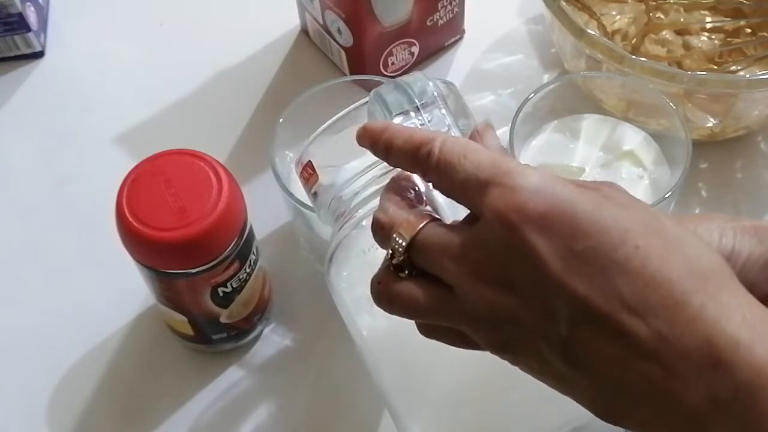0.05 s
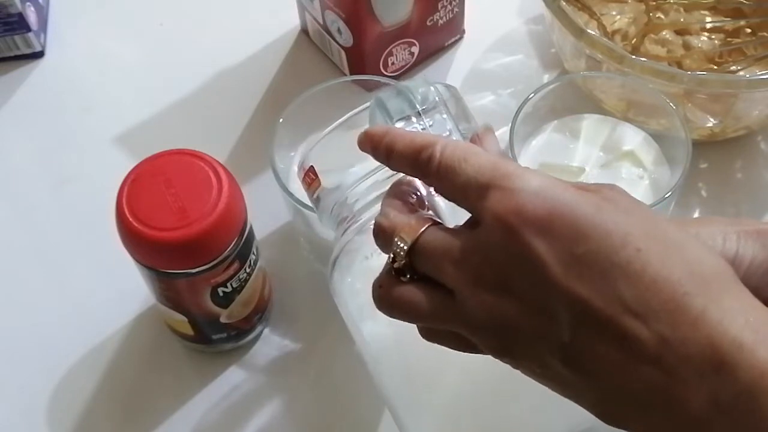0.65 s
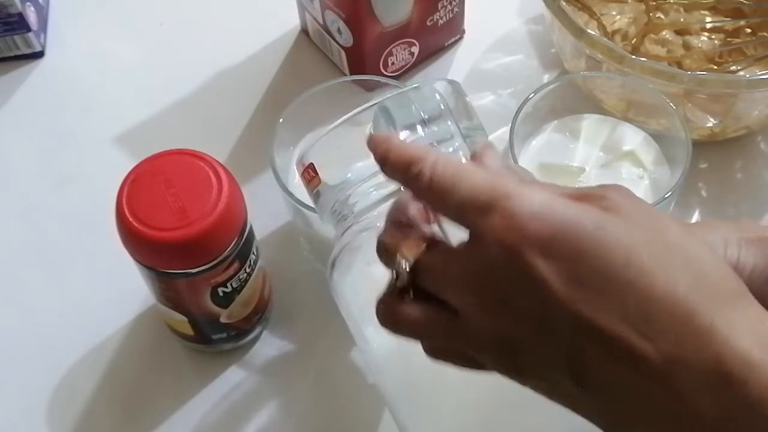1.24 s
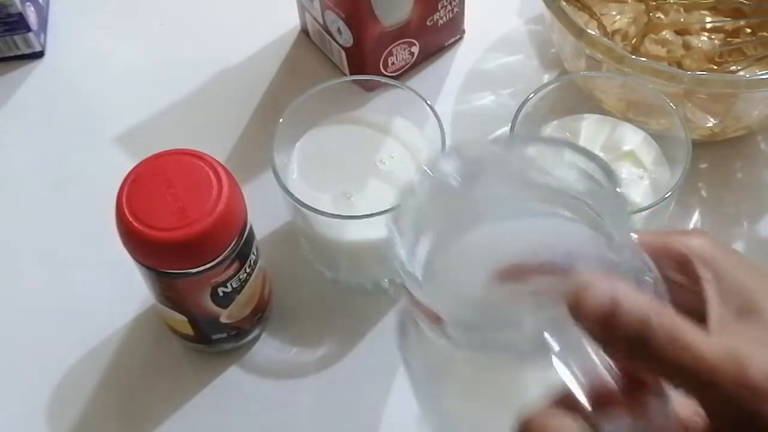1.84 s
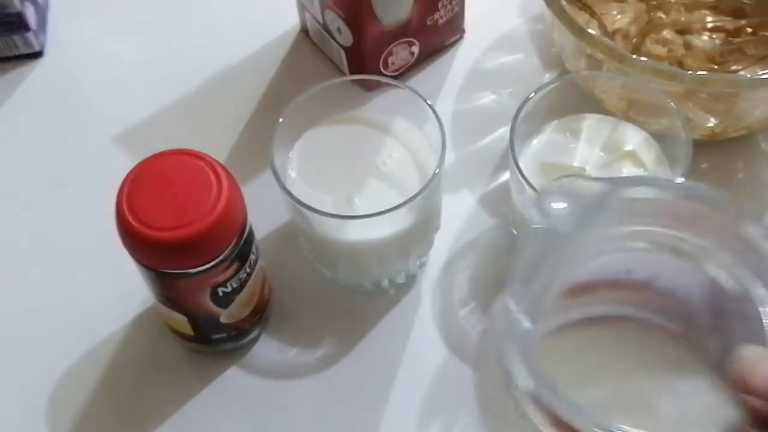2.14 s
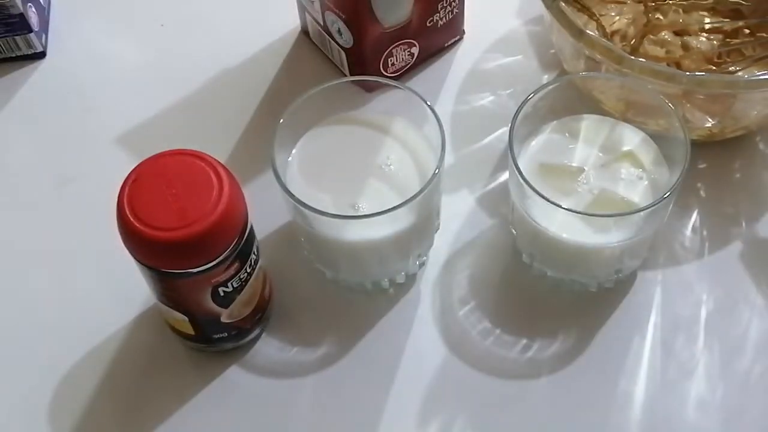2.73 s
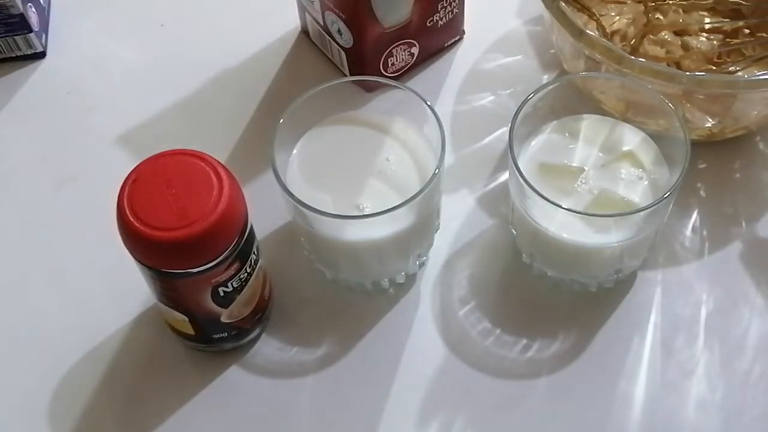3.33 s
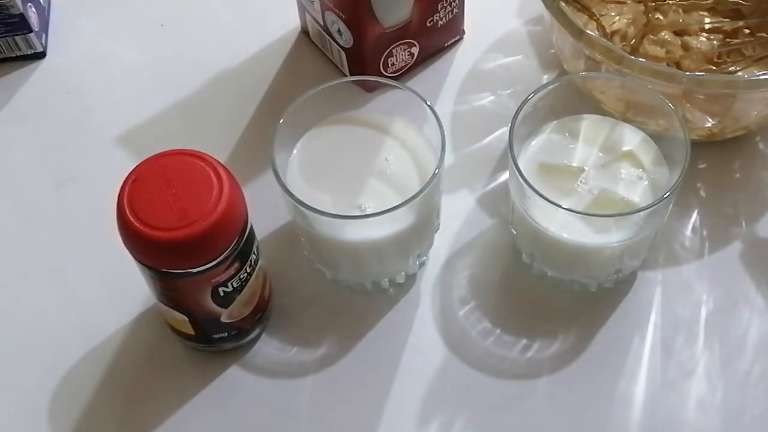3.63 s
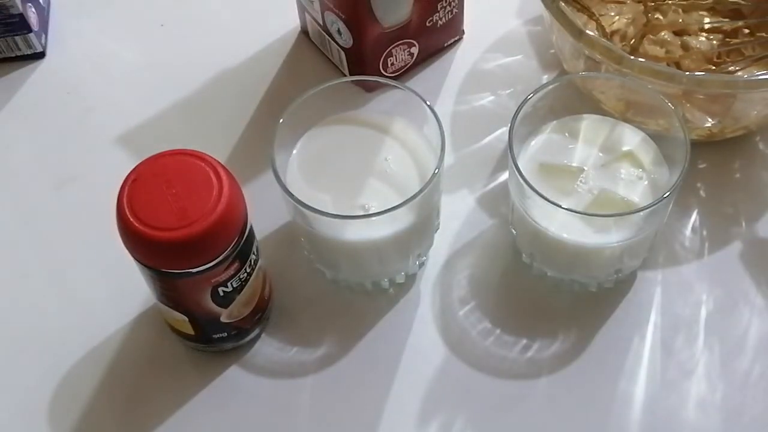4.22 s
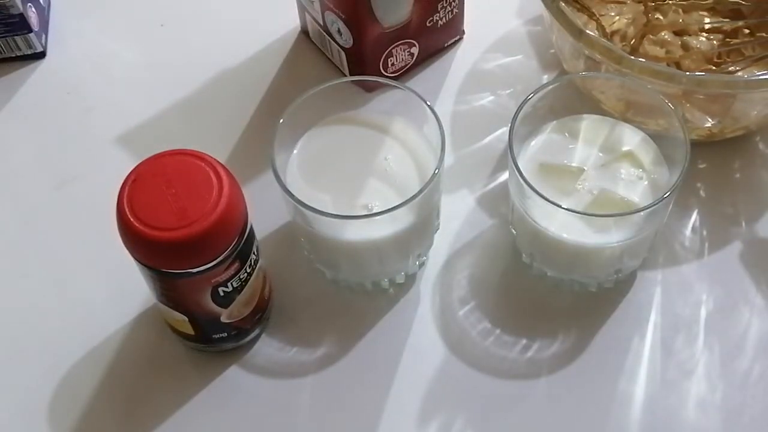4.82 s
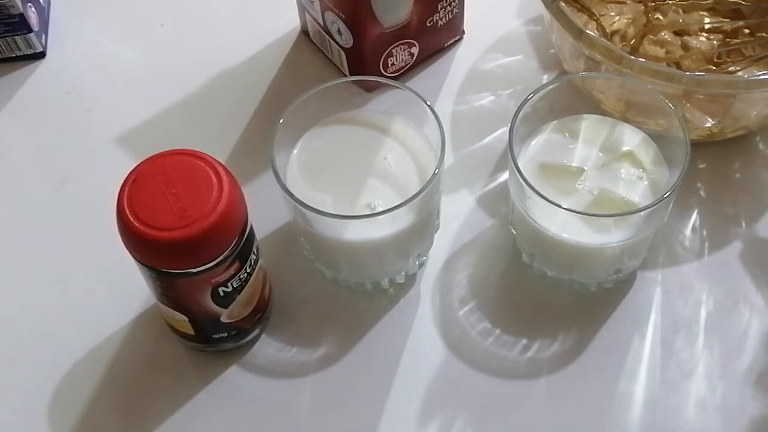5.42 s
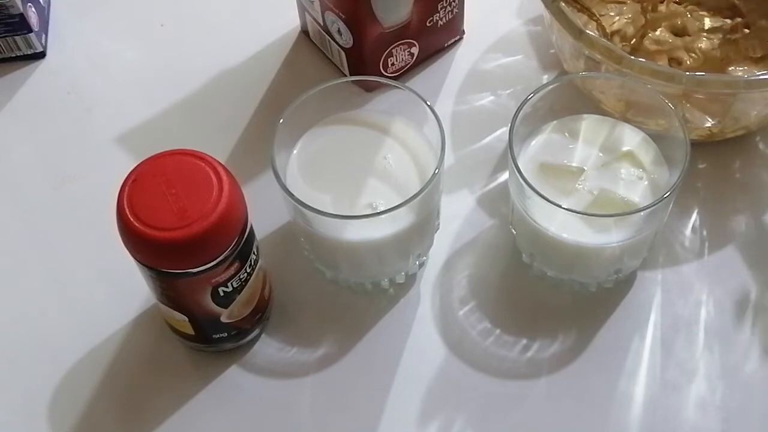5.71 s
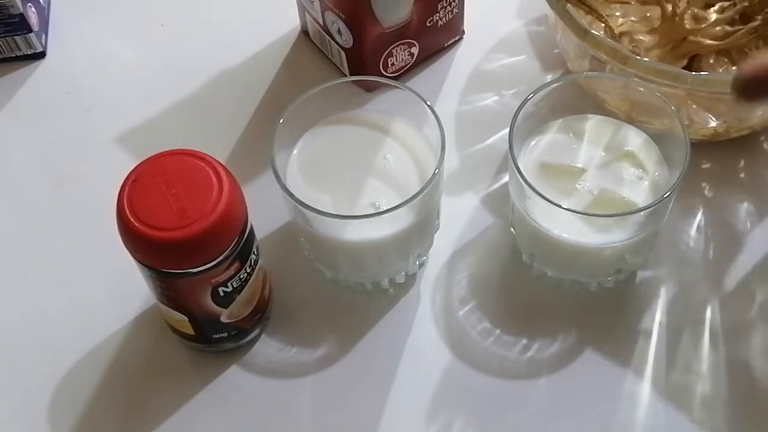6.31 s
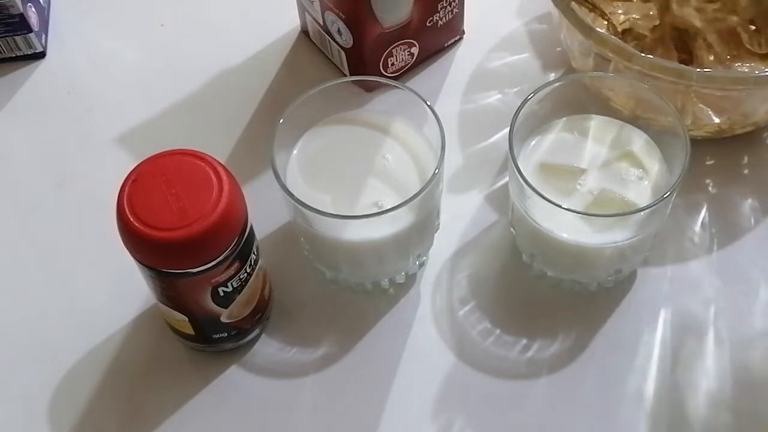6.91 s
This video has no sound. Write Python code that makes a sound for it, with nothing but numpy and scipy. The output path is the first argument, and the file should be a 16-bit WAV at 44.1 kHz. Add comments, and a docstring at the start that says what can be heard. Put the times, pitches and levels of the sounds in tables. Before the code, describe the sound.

The sounds are close, in a quiet kitchen whose hard surfaces add a short reverberation. A very faint motor hum and a high pulsing insect continue throughout. Around 0.5 seconds the last milk gulps faintly out of a bottle, and at 1 second the neck clinks lightly on a tumbler. Faint hand and sleeve rustling follows, with a dull low bump at 2.9 seconds and small glass ticks near 3.3. At about 4.1 seconds the glass bottle lands on the table with a loud, hollow knock. A quick cluster of knocks, equally strong at first, follows from 4.3 seconds as it rocks and rattles to rest by 4.7. From about 4.9 seconds a hand brushes softly about. Something steel, perhaps a spoon, gives short bright clinks between 5.6 and 6.2 seconds. A soft bump and a last brush come around 6.5 seconds.

```python
"""A glass bottle is set down on a kitchen table and rocks to rest, each impact exciting the modes of
the table top, the glass wall and the enclosed air. Before that, the last milk gulps out and the neck
ticks on a tumbler; afterwards a hand brushes about and picks up something of steel, perhaps a spoon.
A motor hums, an insect pulses faintly outside, and the hard room reverberates after each contact."""
import sys
import numpy as np
from scipy import signal
from scipy.fft import rfft, irfft, next_fast_len
from scipy.io import wavfile
from scipy.ndimage import map_coordinates

SR = 44100
rng = np.random.default_rng(int(sys.argv[2]) if len(sys.argv) > 2 else 0)


def transcribe(u):
    """Save the signal u as a 16-bit wav file named by the first command-line argument.

    u: samples, shape (n,) or (channels, n), limited to [-1, 1]; the rate is SR.
    q: integer samples, one column per channel.
    """
    v = np.clip(np.atleast_2d(u).T, -1, 1)
    q = np.round(v * 32767).astype(np.int16)
    wavfile.write(sys.argv[1], SR, q)


N = 311787
TIME = np.arange(N) / SR
AGE = np.arange(SR) / SR  # time since a contact [s]
CAVITY_HZ, BOTTLE_PAN_DB = 559.4, 2.5  # resonance of the air in the bottle; left over right

# spectrum of the table's densely spaced modes: (frequency [Hz], level [dB])
THUD_SPECTRUM = [(40, -46), (70, -12), (125, -1.5), (200, -9.5), (300, -0.5), (450, -6), (650, -7.5),
                 (1300, -4), (1900, -15.5), (3100, -23), (4000, -33.5), (7500, -27), (10000, -38),
                 (15000, -49)]
# spectrum of a hard contact: (frequency [Hz], level [dB])
TICK_SPECTRUM = [(300, 2), (1500, 6.5), (3500, 6), (7000, 11.5), (10000, -2), (15000, -20)]
# likeness of left and right: (frequency [Hz], correlation [0..1])
COHERENCE = [(30, 0.24), (80, 0.55), (150, 0.48), (500, 0.38), (1200, 0.026), (4000, 0.02)]


def amp(db):
    """Amplitude grows tenfold every 20 dB."""
    return 10 ** (np.asarray(db) / 20)


def along(points, hz):
    """Interpolation of (frequency, value) points on a logarithmic frequency axis."""
    freqs, values = np.transpose(points)
    return np.interp(np.log(hz + 1), np.log(freqs + 1), values)


def filtered(x, response):
    """A linear filter multiplies the spectrum by its frequency response."""
    size = x.shape[-1]
    padded = next_fast_len(size + SR // 4)
    return irfft(rfft(x, padded) * response(np.fft.rfftfreq(padded, 1 / SR)), padded)[..., :size]


def low_pass(ratio):
    """Second-order Butterworth response at a ratio of frequency to corner frequency."""
    return 1 / (1 + np.sqrt(2) * 1j * ratio - ratio ** 2)


def softened(x, corner_hz):
    """A longer contact acts as a low-pass filter."""
    return filtered(x, lambda hz: low_pass(hz / corner_hz))


def thinned(x, corner_hz):
    """A lighter contact acts as a high-pass filter."""
    return filtered(x, lambda hz: -(hz / corner_hz) ** 2 * low_pass(hz / corner_hz))


def panned(pan_db):
    """A level difference, left over right, gives direction."""
    return amp([[pan_db / 2], [-pan_db / 2]])


def half_angle(hz):
    """Correlation is the cosine of the angle between two channels; each takes half of it."""
    return np.arccos(np.clip(along(COHERENCE, hz), -1, 1)) / 2


def noise(spectrum, size):
    """Independent mid and side noises sum to coloured stereo of rms 1, more coherent in the bass."""
    def response(hz):
        return amp(along(spectrum, hz)) * [np.cos(half_angle(hz)), np.sin(half_angle(hz))]
    mid, side = filtered(rng.standard_normal((2, size)), response)
    stereo = np.array([mid + side, mid - side])
    return stereo / np.sqrt(np.mean(stereo ** 2) + 1e-20)


def wobble(per_s, size=N):
    """Smooth random modulation: a spline through per_s Gaussian values a second."""
    return map_coordinates(rng.standard_normal(int(size * per_s / SR) + 4), [TIME[:size] * per_s])


def swell(middle_s, width_s):
    """Gaussian envelope whose width is one standard deviation."""
    return np.exp(-.5 * ((TIME - middle_s) / width_s) ** 2)


def fade(t60, attack):
    """A damped vibration builds quickly and decays exponentially, 60 dB in t60 seconds."""
    return amp(-60 * AGE / t60) * (1 - np.exp(-AGE / attack))


def mode(hz, db, t60, attack):
    """A normal mode is a damped sinusoid; low coherence sets its left and right phases apart."""
    phase_offset = half_angle(hz) * rng.choice([-1, 1]) * np.array([[1], [-1]])
    envelope = amp(db + rng.normal(0, 1)) * fade(t60, attack)
    return envelope * np.sin(2 * np.pi * (hz * AGE + rng.random()) + phase_offset)


def in_kitchen(x, wet_db, early_db):
    """Early reflections from near surfaces and a diffuse reverberant tail join the direct sound."""
    # the room's reverberation time: (frequency [Hz], t60 [s])
    reverb_times = [(100, 0.081), (250, 1), (550, 0.66), (1200, 0.49), (3000, 0.49), (6000, 0.4),
                    (12000, 0.32)]
    hz, t, bands = signal.stft(noise([(100, 0), (10000, 0)], SR), SR, nperseg=256)
    decay = amp(-60 * t / along(reverb_times, hz)[:, None])
    tail = signal.istft(bands * decay, SR, nperseg=256)[1][:, :SR]
    tail *= np.clip(AGE / 0.00096, 0, 1) ** 2
    early = rng.standard_normal((2, SR)) * (rng.random((2, SR)) < .02) * fade(0.041, 0.0047)
    response = amp(wet_db) * tail / np.linalg.norm(tail[0])
    response += amp(early_db) * early / np.linalg.norm(early[0])
    return x + signal.fftconvolve(x, response, axes=1)[:, :SR]


def add(track, s, x):
    """Superposition: x joins the track at time s."""
    part = track[:, round(s * SR):][:, :SR]
    part += x[:, :part.shape[1]]


def room_air():
    """Ambient sound is steady broadband noise, strongest in the bass."""
    # spectrum of the air: (frequency [Hz], level [dB])
    air_spectrum = [(15, -40), (25, 2.5), (104, -5), (133, -9), (233, -7), (400, -9.5), (700, -11.5),
                    (1020, -19), (1570, -20), (3000, -21.5), (3900, -28.5), (5000, -23), (7700, -28.5),
                    (15500, -33.5)]
    return amp(-63) * noise(air_spectrum, N)


def motor():
    """A motor radiates a line spectrum, slightly modulated in amplitude and phase."""
    # hum lines: (frequency [Hz], level [dB], flutter rate [1/s])
    lines = [(103.5, -76.5, 4.2), (235, -78, 6.2), (744.4, -73, 2.845), (978, -89, 1.6), (1042, -88.5, 5.2)]
    hum = np.zeros(N)
    for hz, db, flutter in lines:
        envelope = np.sqrt(2) * amp(db) * (1 + .18 * wobble(flutter))
        hum += envelope * np.sin(2 * np.pi * hz * TIME + 0.26 * wobble(flutter))
    return hum * panned(9.9)


def insect():
    """A far chirp is heard as amplitude-modulated narrow-band noise over a steady hiss."""
    # the chirp's band: (frequency [Hz], level [dB])
    chirp_band = [(4500, -62), (5400, -20), (5720, -11), (5830, 4.5), (5930, 7.5), (6060, -0.5),
                  (6250, -23), (6600, -29.5), (8000, -66)]
    # the wider hiss around it: (frequency [Hz], level [dB])
    chorus_band = [(4300, -23), (5400, -4), (5900, 2), (6300, -6), (7200, -11), (8500, -23.5)]
    beats_per_s, first_beat_s, depth_db = 5.54, 0.12, 4.5
    beats = beats_per_s * (TIME - first_beat_s) + 0.14 * wobble(1.95)
    chirp_db = -71 + depth_db * np.cos(2 * np.pi * beats) + 0.89 * wobble(6.2)
    return amp(chirp_db) * noise(chirp_band, N) + amp(-72) * noise(chorus_band, N)


def sleeve():
    """Cloth friction makes a dull, broad noise whose level follows the moving arm."""
    # course of the rustle: (time [s], level [dB])
    motion = [(0, -75), (1.8, -86), (2.3, -68.5), (3.1, -61.5), (4.0, -64.5), (5.2, -73)]
    # spectrum of the cloth: (frequency [Hz], level [dB])
    cloth_spectrum = [(120, -32.5), (400, -8.5), (700, 4), (1200, -12), (2500, -16.5), (4500, -36.5)]
    times, levels_db = np.transpose(motion)
    return amp(np.interp(TIME, times, levels_db) + wobble(8.9)) * noise(cloth_spectrum, N)


def hand_bumps():
    """Soft impacts of hand and arm last long, so they drive mainly the table's low frequencies."""
    # impacts: (time [s], level [dB], low-pass corner [Hz])
    bumps = [(.805, -52, 480), (2.885, -33.5, 105), (3.291, -46.5, 120), (5.163, -53, 395),
             (6.488, -41.5, 159)]
    # the table's response: (frequency [Hz], level [dB])
    bump_spectrum = [(40, -22), (65, 4), (92, 15.5), (140, 4), (220, 2), (350, 7), (600, 13.5), (3000, -14)]
    out = np.zeros((2, N))
    for s, db, bright_hz in bumps:
        bump = amp(db) * softened(noise(bump_spectrum, SR), bright_hz) * fade(0.28, 0.00051)
        add(out, s, in_kitchen(bump, wet_db=-21, early_db=-22))
    return out


def hand_brushing():
    """Sliding friction: skin and cloth catch finely and drag unevenly, modulating a hiss."""
    # strokes: (middle time [s], width [s], level [dB], low-pass corner [Hz])
    brushes = [(3.313, 0.033, -71, 14000), (4.901, 0.079, -58, 15000), (5.12, 0.032, -60.5, 12100),
               (5.462, 0.034, -60, 6850), (5.66, 0.076, -60, 8060), (5.77, 0.05, -58.5, 7940),
               (5.899, 0.056, -55.5, 7900), (6.324, 0.025, -58.5, 9400), (6.552, 0.037, -55, 8400)]
    # spectrum of the friction: (frequency [Hz], level [dB])
    skin_spectrum = [(500, -9), (2500, -7), (4500, -5.5), (5600, -1.5), (6900, 2), (7800, -1.5),
                     (9300, -1.5), (11500, -10), (15000, -8.5)]
    skin = noise(skin_spectrum, N) * amp(1.55 * wobble(per_s=150) + 2.1 * wobble(per_s=20))
    strokes = sum(amp(db) * swell(s, width) * softened(skin, hz) for s, width, db, hz in brushes)
    # the hiss grows as the hand carries the bottle near and falls quickly as it leaves
    nearest_s, approach_s, retreat_s = 2.553, 0.44, 0.076
    span = np.where(TIME < nearest_s, approach_s, retreat_s)
    passing = amp(-66.5) / (1 + ((TIME - nearest_s) / span) ** 2)
    return strokes + passing * skin


def steel_touches(lowest_hz):
    """Each clink rebounds at shrinking intervals; the light re-touches favour the lowest modes."""
    # steel contacts: (time [s], ring level [dB], most excited frequency [Hz], tick level [dB],
    # contact time [s], tick t60 [s], tick high-pass corner [Hz])
    clinks = [(5.603, -52, 4960, -56.5, 0.0033, .017, 4000), (5.645, -33.5, 4900, -38, 0.0041, 0.028, 4500),
              (5.726, -61, 7000, -31, 0.00056, 0.018, 1700), (5.731, -58, 6860, -39, 0.00082, 0.014, 2500),
              (5.874, -53, 9000, -46, 0.0009, .017, 4000), (6.0898, -54, 6800, -42, 0.0012, 0.053, 4970),
              (6.112, -58, 6750, -45.5, 0.001, 0.075, 5500),
              (6.1598, -32.5, 7600, -40, 0.00038, 0.014, 1200)]
    first_gap_s, gap_ratio, loss_db, contact_s = 0.016, .85, 0.5, 0.0026
    delays = np.cumsum(first_gap_s * gap_ratio ** np.arange(3))
    chatter = []
    for s, db, focus_hz, tick_db, _, tick_t60, low_hz in clinks:
        first_db = db - 12 - 6 * np.log2(focus_hz / lowest_hz)  # weaker after a high clink
        for k, delay in enumerate(delays):
            ring_db = first_db - loss_db * k
            chatter.append((s + delay, ring_db, lowest_hz, tick_db - 14, contact_s, tick_t60, low_hz))
    return clinks + chatter


def spoon():
    """The point of contact selects which modes of the steel are excited; the fingers damp them."""
    # modes of the steel: (frequency [Hz], level [dB], t60 [s])
    steel_modes = [(4956, 8, 0.031), (4970, 3, 0.062), (4850, 0, 0.048), (6780, -18, 0.058),
                   (7100, -14, 0.03), (8670, -15, 0.048), (9440, 0.5, 0.04), (9700, -11, 0.04),
                   (10170, 0, 0.026), (11100, -5, .025), (12030, 2, 0.023)]
    falloff_db_per_octave = 22
    out = np.zeros((2, N))
    for s, db, focus_hz, tick_db, contact_s, tick_t60, low_hz in steel_touches(steel_modes[0][0]):
        ring = sum(mode(hz, level - falloff_db_per_octave * abs(np.log2(hz / focus_hz)), t60, contact_s)
                   for hz, level, t60 in steel_modes)
        tick = amp(tick_db) * thinned(noise(TICK_SPECTRUM, SR), low_hz) * fade(tick_t60, contact_s)
        pan_db = np.interp(s, [5.65, 6.15], [-3, 2])  # from right to left
        add(out, s, in_kitchen((amp(db) * ring + tick) * panned(pan_db), wet_db=-7.5, early_db=-10))
    return out


def pouring():
    """The air in the emptying bottle resonates in low, unsteady gulps over the hiss of the stream."""
    # gulps: (start time [s], duration [s], level [dB], frequency [Hz])
    gulps = [(0.372, 0.22, -59, 330), (0.492, 0.12, -55.5, 335), (0.494, 0.17, -53.5, 251),
             (0.648, 0.14, -58, 245)]
    # spectrum of the thin stream of milk: (frequency [Hz], level [dB])
    stream_spectrum = [(1200, -17), (1850, -10), (2050, 6), (2250, -22), (2600, -2), (3600, -42)]
    gulping = np.zeros(N)
    for s, length, db, hz in gulps:
        arch = np.sin(np.pi * np.clip((TIME - s) / length, 0, 1))
        phase = 2 * np.pi * np.cumsum(hz * (1 + 0.08 * wobble(110))) / SR
        gulping += amp(db + 3 * wobble(58.8)) * arch * np.sin(phase)
    stream = amp(-70) * swell(middle_s=0.49, width_s=0.071) * noise(stream_spectrum, N)
    return gulping * panned(7) + stream


def tumbler():
    """Struck by the neck, the milk-damped tumbler rings briefly and transmits a knock to the table."""
    # contacts on the rim: (time [s], ring level [dB], knock level [dB])
    touches = [(1.0157, -47, -39.5), (1.0183, -41, -44)]
    # modes of the tumbler: (frequency [Hz], level [dB], t60 [s])
    tumbler_modes = [(1485, -18, 0.13), (1820, -5, 0.089), (1814, -16, 0.39), (1810, -16, 0.3),
                     (2700, -7, 0.06), (2777, 1.5, 0.069), (2790, -10, 0.16), (3680, -16, 0.082),
                     (4550, -10, 0.078), (8150, -31, 0.074), (9900, -27, 0.046)]
    out = np.zeros((2, N))
    for s, ring_db, knock_db in touches:
        ring = sum(mode(hz, level, t60, attack=0.00084) for hz, level, t60 in tumbler_modes)
        thud = noise(THUD_SPECTRUM, SR) * fade(0.021, 0.00084)
        tick = amp(-27) * noise(TICK_SPECTRUM, SR) * fade(0.027, .0003)
        touch = amp(ring_db) * ring + amp(knock_db) * (thud + tick)
        add(out, s, in_kitchen(touch * panned(3.8), wet_db=-15.5, early_db=-5.5))
    return out


def swing():
    """The cavity resonance sounds faintly as the bottle is swung upright."""
    phase = 2 * np.pi * CAVITY_HZ * TIME + 0.82 * wobble(50)
    return amp(-63.5) * swell(middle_s=2.1, width_s=0.1) * np.sin(phase)


def wall_ring(tilt_db_per_octave):
    """Sharper contacts favour the glass's high modes; grip and contact point shift pitch and level."""
    # modes of the bottle's wall: (frequency [Hz], level [dB], t60 [s])
    wall_modes = [(2125, -10, .05), (2270, -8, 0.062), (2460, -11, 0.04), (2695, -5, 0.066),
                  (3163, -8, .06), (3445, -3.5, 0.091), (4780, -17.5, .07), (5480, -5, 0.083),
                  (5520, -4.5, 0.096), (5780, -0.5, 0.078), (6700, -27, 0.12), (7030, -24, 0.079),
                  (7745, -20, .12), (8130, -16, 0.12), (8330, -21.5, 0.22), (8970, -18.5, 0.1),
                  (9360, -28, 0.056), (9740, -21.5, 0.11), (9950, -24, .06), (11650, -29.5, 0.17),
                  (12000, -33, 0.075)]
    ring = np.zeros((2, SR))
    for hz, db, t60 in wall_modes:
        gripped_hz = hz * (1 + 0.0028 * rng.normal())
        struck_db = db + 3.5 * rng.normal() + tilt_db_per_octave * np.log2(hz / 5500)
        ring += mode(gripped_hz, struck_db, t60, attack=0.00065)
    return ring


def wall_ticks():
    """Brief contacts, perhaps a fingernail and later the rocking base, excite the high wall modes."""
    # small hard touches: (time [s], ring level [dB], click level [dB])
    ticks = [(3.2885, -52, -47.5), (3.296, -64, -56), (3.344, -70, -46), (3.489, -65, -59),
             (3.505, -71, -67), (4.168, -59, -62), (4.392, -48, -64), (4.44, -50, -63), (4.466, -53, -64),
             (4.577, -52, -69), (4.611, -65, -68)]
    out = np.zeros((2, N))
    for s, ring_db, click_db in ticks:
        ring = amp(ring_db) * thinned(wall_ring(tilt_db_per_octave=9), corner_hz=5000)
        click = amp(click_db) * noise(TICK_SPECTRUM, SR) * fade(0.023, 0.0011)
        add(out, s, in_kitchen(ring + click, wet_db=-4, early_db=-15))
    return out


def grinding():
    """Rolling noise: the uneven rim of the base rattles low on the table, in step with its load."""
    # rolls after a landing: (start time [s], duration [s], level [dB])
    rolls = [(4.336, 0.04, -37), (4.408, 0.12, -43.5), (4.572, 0.057, -40.5)]
    # spectrum of the rolling: (frequency [Hz], level [dB])
    roll_spectrum = [(60, -43), (110, -20), (200, -11), (340, 3), (410, 4), (452, 6.5), (495, -8), (560, 4),
                     (720, 3.5), (900, -6), (1150, -12), (1700, -41), (4000, -55), (9000, -100)]
    rise_share, release_s = 0.28, 0.042
    load = np.zeros(N)
    for s, length, db in rolls:
        rise = np.clip((TIME - s) / (rise_share * length), 0, 1)
        release = np.exp(-np.maximum(TIME - s - length, 0) / release_s)
        load += amp(db) * rise * release
    return load * noise(roll_spectrum, N) * panned(BOTTLE_PAN_DB)


def landings():
    """The base knocks and rocks; energy loss makes each rocking contact weaker and the next sooner."""
    # knocks of the base: (time [s], level [dB], low-pass corner [Hz], cavity level [dB],
    # cavity lifetime [s])
    knocks = [(4.0603, -19, 6050, -20, 0.012), (4.276, -35, 950, -30, .028),
              (4.3145, -29, 2400, -25.5, 0.029), (4.329, -18.5, 3940, -39, 0.025),
              (4.337, -26, 7000, -32, .015), (4.367, -37, 900, -27.5, 0.023),
              (4.567, -31.5, 1320, -22.5, 0.034), (4.612, -41.5, 650, -40, 0.027),
              (4.72, -61, 500, -46, 0.042)]
    start_s, first_gap_s, gap_ratio = 4.402, 0.052, 0.94
    first_db, loss_db, bright_hz, life_s = -37.5, 2.5, 750, 0.041
    k = np.arange(3)
    times = start_s + np.cumsum(first_gap_s * gap_ratio ** k) - first_gap_s
    levels_db = first_db - loss_db * k
    return knocks + [(s, db, bright_hz, db - 1.5, life_s) for s, db in zip(times, levels_db)]


def table_top(db, bright_hz):
    """A struck plate rings in its modes; only a heavy blow moves all of it and sounds the lowest."""
    # modes of the table top: (frequency [Hz], level [dB], t60 [s])
    plate_modes = [(110.2, -11, 0.29), (214.7, -18.5, 0.18), (164, -12, 0.11), (297, -6.5, 0.06),
                   (342.3, -14, 0.16), (456.4, -16.5, 0.54), (606, 0.5, 0.078), (677, -5, 0.11),
                   (735, -5.5, 0.11), (859, -10.5, 0.15), (963, -12, 0.11), (1110, -4.5, 0.11),
                   (1145, -8, 0.073), (1270, -10, 0.041), (1432, -7.5, 0.053), (1620, -15, 0.062)]
    heavy_db, octaves_per_db = -18.5, 0.06
    ring = amp(-1.5) * sum(mode(hz, level, t60, attack=0.00046) for hz, level, t60 in plate_modes)
    thud = amp(1.5) * noise(THUD_SPECTRUM, SR) * fade(0.049, 0.00094)
    blow = amp(db) * softened(ring + thud, bright_hz)
    low_hz = 86 * 2 ** np.clip(octaves_per_db * (heavy_db - db), 0, 2)
    return signal.sosfilt(signal.butter(4, low_hz, 'high', fs=SR, output='sos'), blow)


def glass_wall(db, bright_hz):
    """The harder the contact, the more energy enters the wall modes and the base's dense clatter."""
    glass_db = db - 19 + 2.5 * np.log2(bright_hz / 4100)
    ring = wall_ring(tilt_db_per_octave=1)
    clatter = amp(-20) * softened(noise(TICK_SPECTRUM, SR), corner_hz=9400) * fade(0.032, 0.00081)
    return amp(glass_db) * (ring + clatter)


def cavity_note(db, life_s):
    """The enclosed air's resonance takes a few cycles to build; its pitch wavers as the bottle shakes."""
    rise_s = 0.0028
    envelope = (1 - np.exp(-AGE / rise_s)) ** 2 * np.exp(-(AGE / life_s) ** 3)
    hz = CAVITY_HZ * (1 + 0.022 * wobble(117, size=SR))
    return amp(db) * envelope * np.sin(2 * np.pi * np.cumsum(hz) / SR)


def bottle_set_down():
    """Impact excitation: each landing drives three resonators, the table, the glass and the air within."""
    out = np.zeros((2, N))
    pan = panned(BOTTLE_PAN_DB)
    for s, db, bright_hz, cavity_db, life_s in landings():
        add(out, s, in_kitchen(table_top(db, bright_hz) * pan, wet_db=-8.5, early_db=-23))
        add(out, s, in_kitchen(glass_wall(db, bright_hz), wet_db=-2, early_db=-8))
        add(out, s, in_kitchen(cavity_note(cavity_db, life_s) * pan, wet_db=-15, early_db=-23))
    return out


def scene():
    """The sound pressures of all sources add linearly."""
    bottle = pouring() + swing() + bottle_set_down() + wall_ticks() + grinding()
    handling = tumbler() + spoon() + hand_bumps() + hand_brushing() + sleeve()
    return bottle + handling + insect() + motor() + room_air()


def record(dry):
    """Each microphone port has its own treble resonance; nothing passes above the band limit."""
    # imbalance of the ports: (frequency [Hz], left over right [dB])
    port_balance = [(1500, -1), (2750, 0.5), (3400, -3), (4400, -1.5), (5850, -6.5), (7000, -16), (7800, 6),
                    (9000, 9), (11000, 1), (13000, 0)]
    limit_hz = 15700
    return filtered(dry, lambda hz: amp(along(port_balance, hz) * [[.5], [-.5]]) * (hz < limit_hz))


dry = scene()
out = record(dry)
transcribe(out)
```